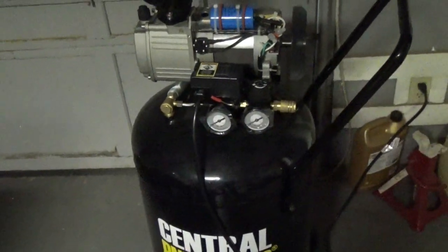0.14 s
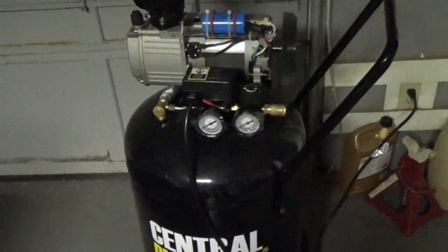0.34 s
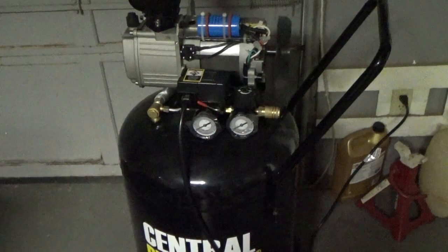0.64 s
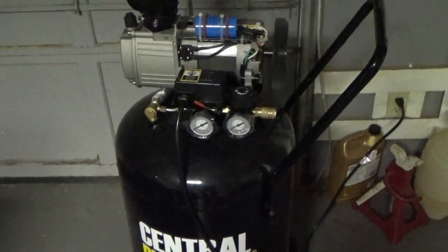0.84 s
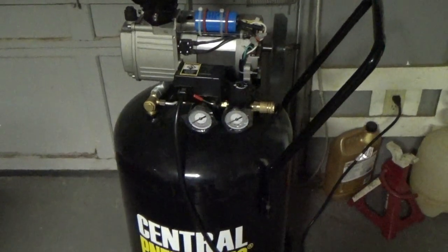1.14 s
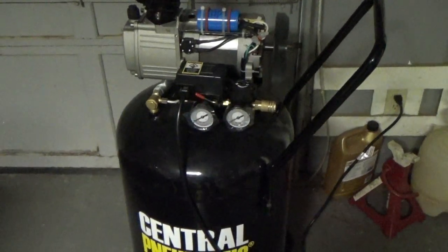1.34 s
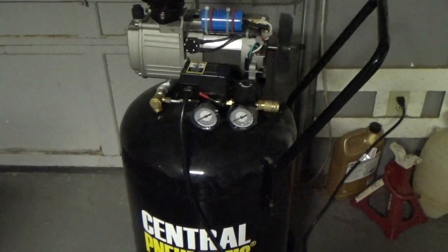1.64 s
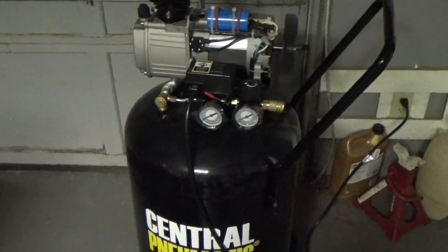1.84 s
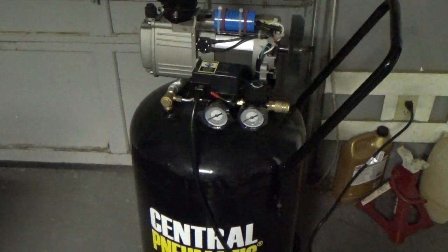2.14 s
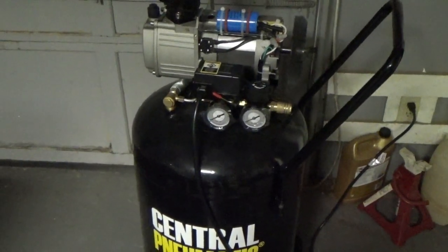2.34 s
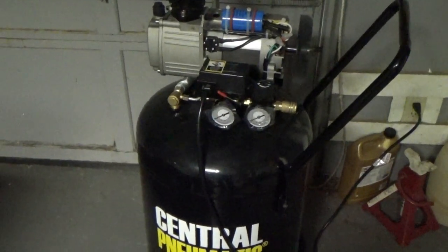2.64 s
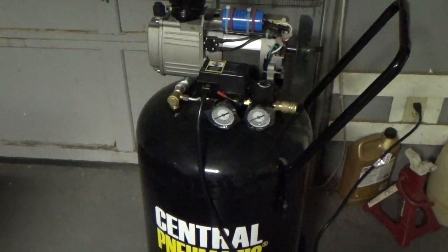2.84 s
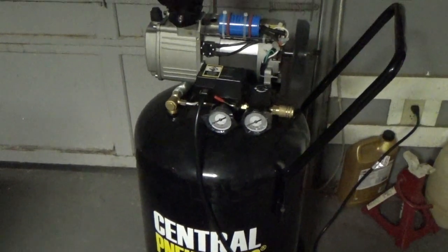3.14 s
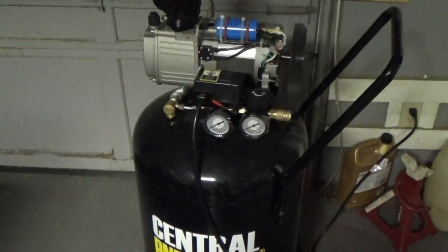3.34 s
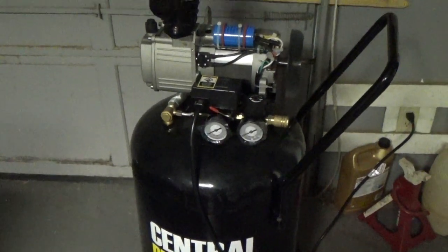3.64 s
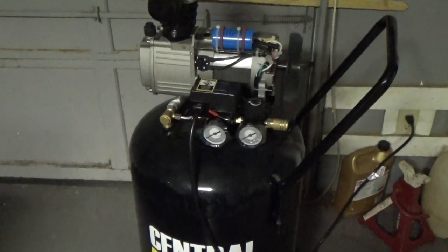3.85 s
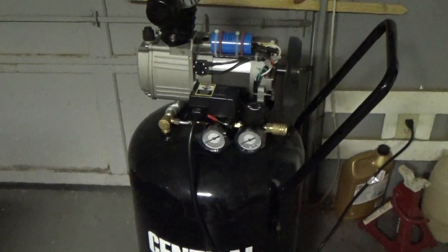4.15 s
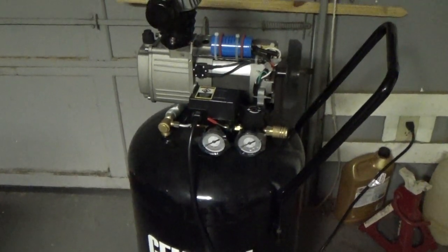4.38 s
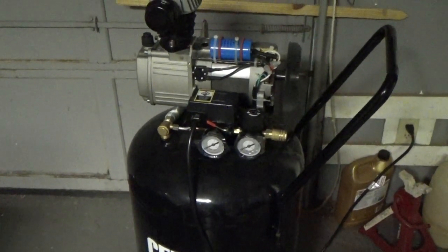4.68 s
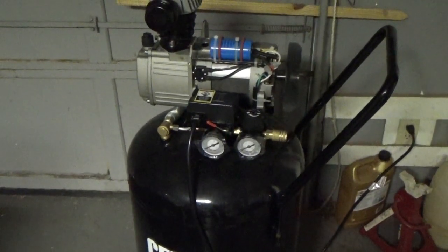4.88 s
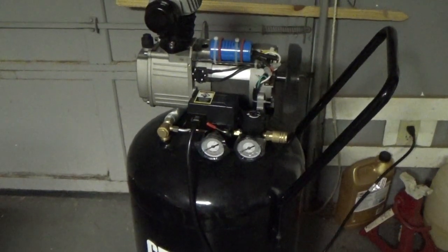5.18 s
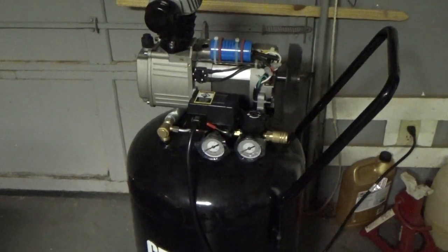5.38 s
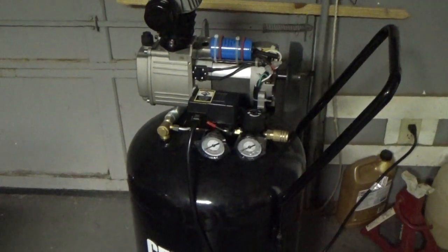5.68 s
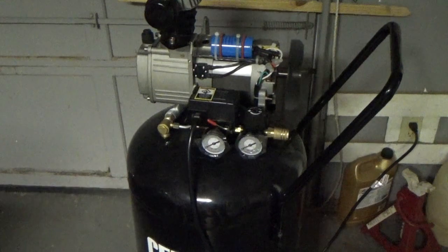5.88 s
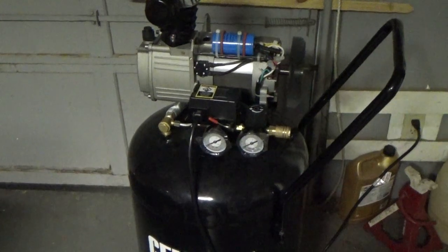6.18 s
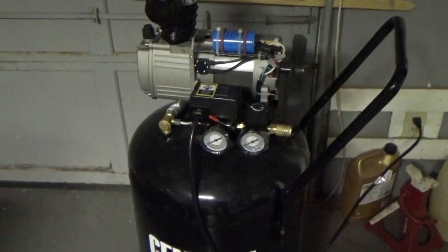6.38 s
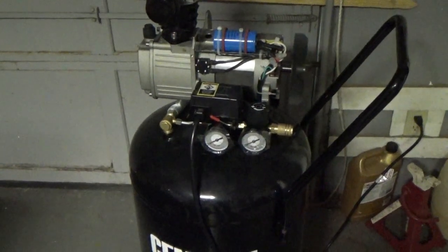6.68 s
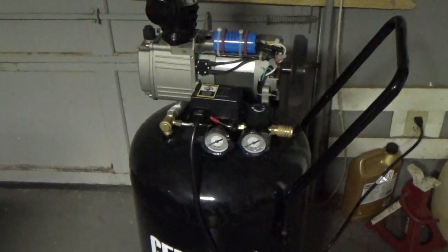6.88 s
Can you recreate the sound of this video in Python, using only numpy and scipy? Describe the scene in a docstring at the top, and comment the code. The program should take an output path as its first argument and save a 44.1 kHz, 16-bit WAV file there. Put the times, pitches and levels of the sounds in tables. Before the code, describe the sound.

An air compressor runs steadily in a garage, with a fast metallic clatter, a droning hum and a bright hiss.

```python
"""Air compressor in a garage

A direct-drive piston compressor fills its tank, a metre from a hand-held camera. Each shaft turn gives
two puffs that make the hum, a few valve and piston knocks that ring the metal, and a burst of hissing air.
The hum grows as the tank fills and a rattle joins late. As the camera sways and rises, the resonances
and the whirring tones of motor and housing change their weight."""
import sys
import numpy as np
from scipy import signal
from scipy.fft import rfft, irfft, next_fast_len
from scipy.io import wavfile
from scipy.ndimage import uniform_filter1d, map_coordinates

SR = 44100
rng = np.random.default_rng(int(sys.argv[2]) if len(sys.argv) > 2 else 0)


def transcribe(signal):
    """Save signal, clipped to [-1, 1], as a 16-bit WAV file at the path in sys.argv[1]."""
    frames = np.atleast_2d(signal).T
    limited = np.clip(frames, -1, 1)
    pcm = np.round(limited * 32767).astype(np.int16)
    wavfile.write(sys.argv[1], SR, pcm)


N = 309582
TIME = np.arange(N) / SR
GRID_HZ = np.arange(4097) * SR / 8192
SHAFT_HZ = 57.6


def undb(db):
    """Amplitude ratio of a level in decibels."""
    return 10 ** (np.asarray(db) / 20)


def unit(x):
    """Normalisation to rms 1."""
    return x / np.sqrt(np.mean(x ** 2))


def curve(points):
    """Linear interpolation of (time, value) points."""
    return np.interp(TIME, *np.transpose(points))


def trend(db, db_per_s):
    """A linear change of level that passes db at mid-run."""
    return db + db_per_s * (TIME - TIME.mean())


def walk(rate_hz):
    """Smooth random fluctuation with a spread near 1."""
    hold = int(SR / rate_hz)
    steps = np.repeat(rng.standard_normal(N // hold + 1), hold)
    return 1.2 * uniform_filter1d(steps, hold)[:N]


def spectrum(points):
    """Interpolation of (frequency, level) points over log frequency."""
    hz, db = np.transpose(points)
    return np.interp(np.log(GRID_HZ + 1), np.log(hz), db)


def colour(x, db):
    """Minimum-phase filter with gain db on the frequency grid."""
    cepstrum = irfft(np.log(undb(db)))
    half = len(GRID_HZ) - 1
    cepstrum[1:half] *= 2
    cepstrum[half + 1:] = 0
    return signal.fftconvolve(x, irfft(np.exp(rfft(cepstrum))))[:N]


def reverberate(x, t60):
    """Diffuse decay: dense echoes, even in colour and of energy 1, fall 60 dB in t60 seconds."""
    t = TIME[:SR // 3]
    echoes = rng.standard_normal(len(t)) * np.exp(-np.log(1000) * t / t60)
    power = uniform_filter1d(np.abs(rfft(echoes, 2 * len(GRID_HZ) - 2)) ** 2, size=15)
    echoes = colour(echoes, -10 * np.log10(power))[:len(t)]
    return signal.fftconvolve(x, echoes / np.sqrt(np.sum(echoes ** 2)))[:N]


# Sideways sway: (time [s], place [0 = first, 1 = second])
CAMERA_PLACE = [(0, .9), (1.0, 0.43), (2.0, 0), (2.7, 0.4), (3.1, 0), (3.55, 0.92), (7.02, 0.91)]
# Rise: (time [s], height [0 = low, 1 = high])
CAMERA_HEIGHT = [(0, 0.25), (3.0, 0.39), (3.5, 0.91), (7.02, 1)]
def camera_path():
    """A moving receiver samples the sound field at changing place and height."""
    return curve(CAMERA_PLACE), curve(CAMERA_HEIGHT)


# Harmonics of the hum: (order [multiple of shaft rate], relative level [dB])
HUM_HARMONICS = [(1, -38), (2, -21), (3, -12), (4, -9.5), (5, -5), (6, -29.5), (7, -9), (8, 1.5), (9, -6),
                 (10, -7.5), (11, 0), (12, -20), (13, -0.5), (14, -21), (15, -7), (16, -7), (17, -24),
                 (18, -15), (19, -15), (20, -23), (21, -8.5), (22, -42), (23, -16.5), (24, -13.5)]
# Intake puff, delivery puff and valve rebound: (instant [turns], relative level [dB])
PUFF_TIMING = [(.312, -1.2), (.835, 0), (.134, -4.7)]
# Standing waves: (order [multiple of shaft rate], gain from low to high [dB])
STANDING_WAVES = [(3, 1), (7, -3.5), (9, -4.5), (10, 11.5), (11, -5.5), (13, -5), (14, 26)]
def hum(turns, height, db, waver_db):
    """Periodic puffs form a harmonic series; their timing sets the phases. Upper orders waver more."""
    out, shifts = 0, {round(order): shift_db for order, shift_db in STANDING_WAVES}
    for order, order_db in HUM_HARMONICS:
        puffs = sum(undb(puff_db) * np.exp(-2j * np.pi * order * at) for at, puff_db in PUFF_TIMING)
        waver = waver_db * order / len(HUM_HARMONICS) * walk(2.14)
        shift = shifts.get(order, 0) * (height - height.mean())
        out += undb(order_db + shift + waver) * np.cos(2 * np.pi * order * turns + np.angle(puffs))
    return undb(db) * unit(out)


# Motor and housing tones: (order [multiple of shaft rate, rounded in use],
# relative level at first place [dB], at second place [dB])
WHIR_TONES = [(27, -50, -47), (29, -38, -37.5), (31, -48, -42.5), (34, -42, -45), (35, -42, -42),
              (42, -49, -53), (46, -59, -37.5), (49, -55, -38), (52, -38, -61), (55, -54, -40.5),
              (70.3, -60, -39), (82.8, -38.5, -40.5), (87, -47, -44)]
def whir(turns, place, db, waver_db):
    """Forced vibration: tones locked to the shaft swell and fade among the room's standing waves."""
    out = 0
    for order, first_db, second_db in WHIR_TONES:
        level_db = db + first_db + (second_db - first_db) * place + waver_db * walk(2.5)
        phase = 2 * np.pi * (round(order) * turns + rng.random())
        out += undb(level_db) * np.sqrt(2) * np.cos(phase)
    return out


def knock(turns, at, jitter_us=13, scatter_db=.8):
    """An impulse train: a nearly equal blow at the same point of every turn."""
    clicks, taps = np.zeros(N), np.arange(-5, 7)
    when = np.interp(np.arange(int(turns[-1]) + 1) + at, turns, np.arange(N))
    when = when[(when > 20) & (when < N - 20)]
    chance = rng.standard_normal((len(when), 2))
    when += chance[:, 0] * jitter_us * SR / 10 ** 6
    index = when.astype(int)[:, None] + taps
    pulses = np.sinc(index - when[:, None])  # blows fall between samples
    np.add.at(clicks, index, undb(scatter_db * chance[:, 1:]) * pulses)
    return unit(clicks)


# Blows of a turn: (instant [turns], relative level with camera low [dB], with camera high [dB])
PUMP_BLOWS = [(.06, 0, -10.5), (.27, 4, 7.5), (.43, 3.5, -0.5), (.58, 6.5, 2.5), (.82, 4.5, 3)]
def pump_knocks(turns, height):
    """Superposition of valve and piston impacts, each weighted by the camera's height."""
    return unit(sum(knock(turns, at) * undb(low_db + (high_db - low_db) * height)
                    for at, low_db, high_db in PUMP_BLOWS))


# Casing response: (frequency [Hz], relative spectral density [dB])
CASING_SPECTRUM = [(1100, -65.5), (1400, -68), (2000, -65.5), (3000, -61.5), (3800, -69.5), (4800, -62),
                   (6500, -66), (8000, -66.5), (9800, -54), (11500, -63.5), (13300, -58.5)]
def clatter(clicks, db, ring_t60, room_db, room_t60, low_hz, paths=6):
    """Impacts excite the casing's dense modes; their paths to the camera change as it drifts."""
    clicks = signal.sosfilt(signal.butter(4, low_hz, "high", fs=SR, output="sos"), clicks)
    drift = np.linspace(0, paths - 1, N)
    out = 0
    for path in range(paths):
        power_share = np.clip(1 - np.abs(drift - path), 0, 1)
        ringing = reverberate(clicks, ring_t60) + undb(room_db) * reverberate(clicks, room_t60)
        out += np.sqrt(power_share) * ringing
    return undb(db) * np.sqrt(SR / 2) * colour(out, spectrum(CASING_SPECTRUM))


def airflow(turns, opens_turns, decay_turns, leak, scatter_db, grain_db):
    """Pulsating flow: the valve opens once a turn and the jet decays towards a steady leak."""
    since_opening = (turns - opens_turns) % 1
    unevenness = undb(scatter_db * walk(SHAFT_HZ) + grain_db * walk(900))
    return unit((leak + np.exp(-since_opening / decay_turns)) * unevenness)


# Noise of moving air: (frequency [Hz], relative spectral density [dB])
AIR_SPECTRUM = [(30, -86), (100, -84.5), (180, -75.5), (300, -69.5), (520, -65), (660, -60), (900, -61),
                (1350, -64), (2150, -59.5), (2600, -60.5), (7300, -65), (9700, -59.5), (11500, -61),
                (13500, -62), (14300, -55.5)]
def air_noise(flow, rush_db, hiss_db, split_hz, rush_pulse, room_db, room_t60):
    """Turbulence: the jet hisses in bursts above split_hz; below, the fan's rush is nearly even."""
    jet_share = 1 / (1 + (split_hz / (GRID_HZ + 1)) ** 4)
    jet = flow, jet_share, hiss_db
    fan = 1 + rush_pulse * flow, 1 - jet_share, rush_db
    out = 0
    for envelope, share, db in jet, fan:
        noise = envelope * rng.standard_normal(N)
        noise = unit(noise + undb(room_db) * reverberate(noise, room_t60))
        out += undb(db) * colour(noise, spectrum(AIR_SPECTRUM) + 10 * np.log10(share + 1e-6))
    return np.sqrt(SR / 2) * out


# Sharp valve modes: (frequency [Hz], width [Hz], strike instant [turns], level [dB],
# gain from first to second place [dB], gain from low to high [dB], flicker [dB])
VALVE_RESONANCES = [(2236, 40, .5, -48, 10, -2.5, 5), (3028, 144, .58, -33, 1.5, -8.5, 1.5),
                    (4780, 270, .82, -29.5, -10, 2, 0.9), (9870, 79, .25, -28, 0.5, -5, 1.5)]
def valve_ring(turns, place, height, shake, shake_db, reseat_hz):
    """Resonance: each mode is struck once a turn; the other knocks and passing air keep it ringing."""
    out = 0
    for hz, width, at, db, place_db, height_db, flicker_db in VALVE_RESONANCES:
        drive = knock(turns, at) + undb(shake_db) * shake
        ring = signal.lfilter(*signal.iirpeak(hz, hz / width, fs=SR), drive)
        ring = signal.lfilter(*signal.iirpeak(hz, hz / (3 * width), fs=SR), ring)  # steeper skirts
        flicker = flicker_db * walk(reseat_hz)  # the valves seat unevenly
        out += unit(ring) * undb(db + place_db * place + height_db * height + flicker)
    return out


# Head, fin and pipe modes: (frequency [Hz], width [Hz], gain with camera low [dB], with camera high [dB])
METAL_RESONANCES = [(685, 18.3, 8.5, 14.5), (2216, 140, 3.5, 3.5), (3550, 580, 0.5, 2.5), (5650, 640, 1, 4),
                    (6540, 67, -2, 4.5), (7620, 160, 3.5, 3.5), (8920, 220, -1, 5), (9500, 140, -2, -1.5),
                    (9700, 98, 3.5, 2), (10250, 120, 3, 4), (10380, 250, -1.5, -4.5), (11480, 240, 3, 2),
                    (12900, 80, 6, 8), (13180, 180, 0, 5.5)]
def pump_metal(x, height):
    """Directivity: each resonance beams differently towards the low and the high camera."""
    low = high = 0
    for hz, width, low_db, high_db in METAL_RESONANCES:
        peak = 1 / (1 + (2 * (GRID_HZ - hz) / width) ** 2)
        low += low_db * peak
        high += high_db * peak
    return (1 - height) * colour(x, low) + height * colour(x, high)


# Glancing reflection off the tank: (time [s], delay [ms])
TANK_DELAY = [(0, .64), (3.1, .61), (3.5, .57), (4.4, .56), (5.3, .46), (6.0, .48), (6.7, .42)]
def tank_echo(x, db):
    """Comb filtering: a reflection whose path moves with the camera gives a faint phasing."""
    delay_samples = curve(TANK_DELAY) * SR / 1000
    reflection = map_coordinates(x, [np.arange(N) - delay_samples], order=3)
    return (x + undb(db) * reflection) / np.sqrt(1 + undb(db) ** 2)


def rattle(flow, db, start_s, rise_s, low_hz, high_hz, scatter_db):
    """Amplitude-modulated noise: a rough rattle, uneven from turn to turn, fades in and stays."""
    shaken = flow * undb(scatter_db * walk(SHAFT_HZ)) * rng.standard_normal(N)
    band = signal.sosfilt(signal.butter(3, [low_hz, high_hz], "band", fs=SR, output="sos"), shaken)
    return undb(db) * unit(band) * np.clip((TIME - start_s) / rise_s, 0, 1)


# Lead of the left microphone: (frequency [Hz], phase [rad])
LEFT_LEAD = [(0, 0), (520, 0.47), (1030, 0.3), (1380, 0), (2150, 0.16), (2410, 0), (3700, 0.39),
             (4820, 0.43), (9040, 0.074), (14900, 0.0)]
# Wall echoes in the side signal: (frequency [Hz], relative level [dB])
WALL_SPREAD = [(60, -16), (110, -24), (200, -22), (380, -21), (690, -14.5), (1280, -8.5), (2350, -10.5),
               (4340, -12), (8000, -20.5), (14800, -16)]
def garage(x, wall_db, wall_t60, balance_db):
    """Two spaced microphones: the left leads slightly in phase, and wall echoes reach them unequally."""
    size = next_fast_len(N)
    lead = np.interp(np.arange(size // 2 + 1) * SR / size, *np.transpose(LEFT_LEAD))
    direct_side = irfft(rfft(x, size) * 1j * np.tan(lead / 2), size)[:N]
    walls = colour(reverberate(x, wall_t60), spectrum(WALL_SPREAD))
    # long waves reach both microphones alike
    walls = signal.sosfilt(signal.butter(2, 180, "high", fs=SR, output="sos"), walls)
    side = direct_side + undb(wall_db) * walls
    return np.array([(x + side) * undb(balance_db), (x - side) * undb(-balance_db)])


def scene():
    """Synchronous excitation: one slightly wavering shaft drives hum, whir, knocks and air."""
    place, height = camera_path()
    turns = SHAFT_HZ * TIME + 0.0021 * walk(1.207) + 0.00048 * walk(14)
    clicks = pump_knocks(turns, height)
    flow = airflow(turns, opens_turns=.21, decay_turns=0.72, leak=0.52, scatter_db=0.8, grain_db=2.6)
    casing = clatter(clicks, db=-4.0, ring_t60=.026, room_db=-1.5, room_t60=0.21, low_hz=1440)
    # as the tank fills, the pump labours harder and passes less air
    hum_db, rush_db, hiss_db = trend(-27, 0.49), trend(-2.5, 0.38), trend(-0.66, -0.4)
    air = air_noise(flow, rush_db, hiss_db, split_hz=7500, rush_pulse=0.38, room_db=-7, room_t60=0.18)
    shake = clicks + flow * rng.standard_normal(N)
    valves = valve_ring(turns, place, height, shake, shake_db=-4, reseat_hz=9)
    tones = hum(turns, height, hum_db, waver_db=1.3) + whir(turns, place, db=-1.5, waver_db=2.3)
    bright = tank_echo(pump_metal(casing + air, height), db=-19)
    rattling = rattle(flow, db=-31, start_s=5.76, rise_s=0.42, low_hz=990, high_hz=3000, scatter_db=2.5)
    return garage(tones + bright + valves + rattling, wall_db=-1.8, wall_t60=0.095, balance_db=-0.24)


def record(dry):
    """Band limiting: the camera cuts the highest treble."""
    lowpass = signal.firwin(601, 14250, window="blackman", fs=SR)
    return signal.fftconvolve(dry, lowpass[None], "same")


dry = scene()
out = record(dry)
transcribe(out)
```